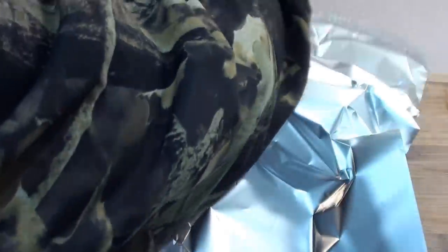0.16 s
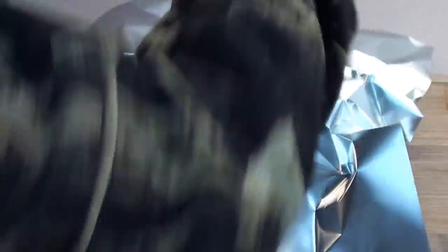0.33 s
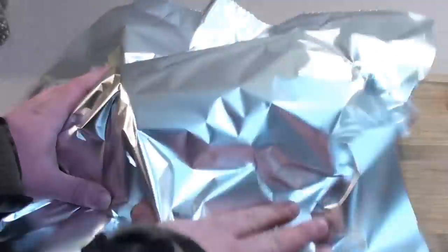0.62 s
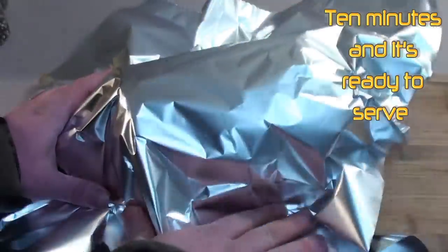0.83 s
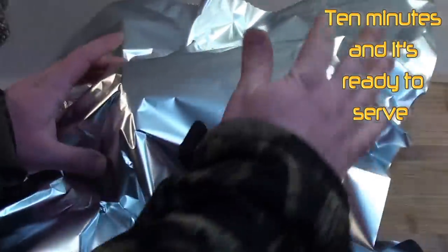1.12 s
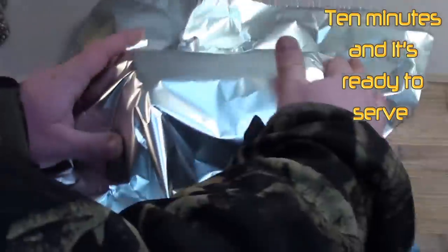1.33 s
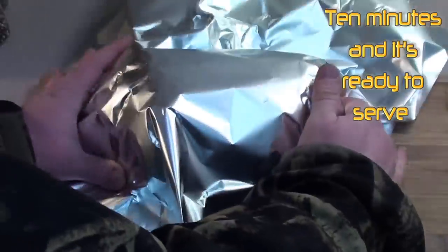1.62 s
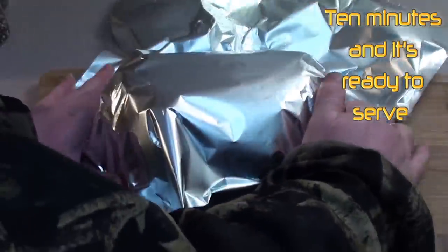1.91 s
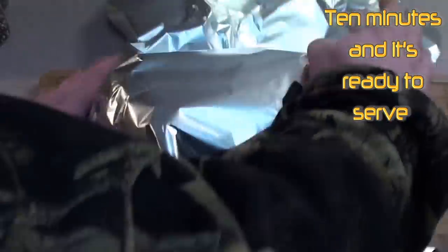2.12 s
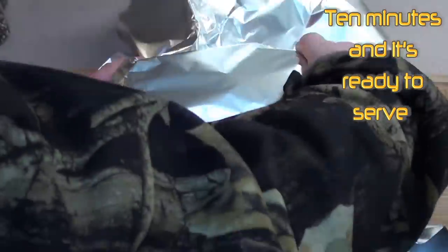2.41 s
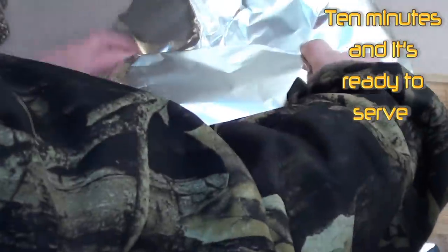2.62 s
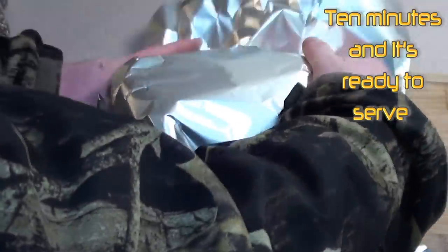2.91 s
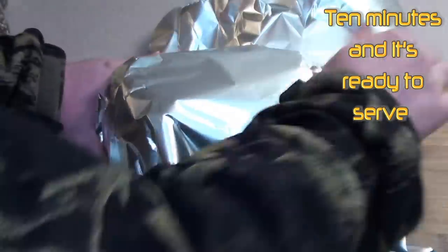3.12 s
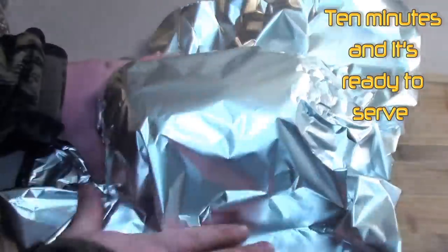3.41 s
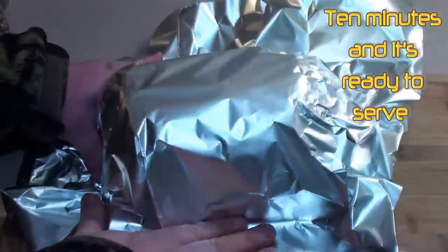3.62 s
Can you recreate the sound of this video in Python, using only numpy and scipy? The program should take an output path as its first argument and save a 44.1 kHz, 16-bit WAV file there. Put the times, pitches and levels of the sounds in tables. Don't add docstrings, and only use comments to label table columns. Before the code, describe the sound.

Close, bright foil crinkling with sharp snaps and duller pops as hands wrap a dish; it dips early, crackles almost continuously, fades late to faint ticks, then returns loudly until the end, over quiet room noise.

```python
import sys
import numpy as np
from scipy import signal
from scipy.fft import rfft, irfft
from scipy.io import wavfile
from scipy.ndimage import uniform_filter1d

SR = 44100
rng = np.random.default_rng(int(sys.argv[2]) if len(sys.argv) > 2 else 0)


def transcribe(signal):
    frames = np.atleast_2d(signal).T
    limited = np.clip(frames, -1, 1)
    pcm = np.round(limited * 32767).astype(np.int16)
    wavfile.write(sys.argv[1], SR, pcm)


def invert_db(level):
    return 10 ** (np.asarray(level, dtype=float) / 20)


N = 165375

# t/s, level/dB
SQUEEZES = [
    [(0.0, -18), (0.06, -21), (0.068, -17), (0.12, -18.5), (0.2, -16), (0.235, -20.5), (0.288, -21)],
    [(0.293, -16.5), (0.33, -18.5), (0.34, -25), (0.4, -31), (0.48, -43), (0.58, -49), (0.588, -25.5),
     (0.604, -36), (0.628, -64)],
    [(2.14, -27), (2.148, -20), (2.17, -17), (2.356, -16.5), (2.44, -18.5), (2.492, -20), (2.515, -36)],
    [(2.52, -18.5), (2.554, -21.5), (2.584, -28.5), (2.59, -19), (2.6, -28.5), (2.64, -25.5), (2.68, -35)],
    [(2.685, -32), (2.713, -18), (2.771, -28), (2.779, -17.5), (2.795, -21), (2.885, -16.5), (3.047, -18.5),
     (3.083, -25), (3.098, -24)],
]
# t/s, level/dB
KNEADING = [
    [(0.632, -24), (0.638, -16.5), (0.856, -19)],
    [(0.858, -18.5), (1.006, -23), (1.014, -17), (1.052, -22)],
    [(1.055, -20), (1.061, -18), (1.131, -27), (1.143, -18.5), (1.161, -18), (1.177, -27.5), (1.189, -19),
     (1.222, -44)],
    [(1.226, -37), (1.232, -25.5), (1.274, -15.5), (1.344, -18), (1.372, -19.5), (1.442, -14.5),
     (1.534, -17.5), (1.548, -21)],
    [(1.552, -21), (1.618, -17.5), (1.85, -17.5)],
    [(1.854, -12), (1.858, -15.5), (1.948, -21.5), (2.06, -17), (2.135, -29.5)],
    [(3.394, -24), (3.398, -15.5), (3.414, -14), (3.564, -19), (3.588, -14), (3.6, -19.5)],
    [(3.604, -22.5), (3.654, -18.5), (3.66, -27), (3.67, -15.5), (3.682, -23), (3.75, -18)],
]
# t/s, level/dB
LETTING_GO = [
    [(3.102, -20.5), (3.14, -24), (3.186, -25.5), (3.198, -34), (3.2, -30)],
    [(3.203, -15.5), (3.214, -24), (3.218, -27), (3.251, -37), (3.259, -35), (3.29, -49), (3.322, -59)],
    [(3.325, -29), (3.335, -48), (3.352, -45), (3.357, -50), (3.376, -36), (3.391, -26)],
]
# t/s, peak level/dB, brightest f/Hz
BIG_CREASES = [(0.0168, -12, 8510), (0.0648, -8, 8110), (0.2917, -13, 4730), (0.438, -22, 3160),
               (0.574, -26, 4790), (0.5863, -17, 6100), (0.634, -4, 6550), (0.7473, -6, 6700),
               (0.8583, -0.5, 6860), (0.8803, 0, 6100), (0.9328, -5.5, 8070), (0.9535, -4, 3470),
               (0.973, -6, 9200), (1.0122, -8, 5970), (1.058, -4, 5760), (1.1414, -15, 7810),
               (1.1565, -16, 6200), (1.1862, -9, 5840), (1.2316, -14, 6020), (1.2687, 0, 5110),
               (1.5527, -6, 8930), (1.82, -5, 8680), (1.9632, -3.5, 6230), (2.147, -4.5, 6610),
               (2.206, -16, 8130), (2.4422, -2, 8610), (2.5187, -8, 5700), (2.588, -6, 7930),
               (2.616, -19, 6010), (2.6928, -10, 5260), (2.7117, -15, 8000), (2.7768, -6, 5240),
               (3.1047, -2.5, 6060), (3.142, -8.5, 4950), (3.2013, -17, 4800), (3.2538, -15, 8410),
               (3.325, -34, 5870), (3.3558, -31, 6260), (3.3775, -25, 6750), (3.3981, -9, 6070),
               (3.4102, -11, 6820), (3.621, -1.5, 7670), (3.647, -3.5, 6210), (3.6671, -7, 8130),
               (3.6972, -9, 6150), (3.716, -3, 6400)]
# t/s, tilt/dB per octave
FINENESS = [(0, -1.5), (.2, 2), (.36, -1.5), (.55, 2), (.7, 6.5), (.9, 0), (1.1, 0.5), (1.3, -.5),
            (1.5, -1), (1.75, 0.5), (2.0, -2), (2.35, 1), (2.6, -4.5), (2.85, 0), (3.1, -1.5), (3.25, -3),
            (3.38, -1.5), (3.45, 2.5)]
# f/Hz, level/dB
SHEET_COLOUR = [(88, -54), (150, -18.5), (217, -25), (244, -33.5), (1180, -7.5), (2370, -6.5), (5680, -2),
                (8880, 1), (15600, -13)]
# f/Hz, time to fall 60 dB/s
SHEET_RING = [(200, 0.26), (1500, 0.04), (6000, 0.077), (15000, 0.026)]
# f/Hz, rise/dB, width/octaves
RESONANCES = [(2350, -2.5, 0.11), (3310, 2, 0.12), (4040, -3.5, 0.058), (5930, 2.5, 0.098),
              (8940, -0.5, 0.036)]
# t/s, level/dB
BENDING = [(0.0, -37.5), (0.42, -45.5), (0.62, -50), (0.67, -36), (0.78, -47), (0.97, -47), (1.13, -53),
           (1.37, -36.5), (2.91, -43), (2.96, -35.5), (3.25, -44), (3.37, -52.5), (3.402, -27.5),
           (3.55, -59), (3.559, -29), (3.7, -53), (3.75, -51)]
# t/s, peak level/dB, f/Hz
FLIPS = [(0.06, -23, 1104), (0.136, -11, 1430), (0.586, -32, 1790), (0.637, -16, 2330), (0.668, -15, 1080),
         (0.731, -22, 1620), (0.806, -19, 1630), (0.882, -19, 1930), (0.953, -14, 1680),
         (1.016, -25.5, 2080), (1.133, -31, 1200), (1.23, -29, 910), (1.338, -29.5, 865),
         (1.364, -20, 1460), (1.415, -12.5, 1960), (1.553, -20, 1680), (1.66, -19.5, 1780),
         (1.706, -25, 984), (1.796, -30, 1960), (1.851, -12, 2080), (1.883, -14, 1920),
         (2.179, -16.5, 1280), (2.492, -34, 2160), (2.665, -27, 1700), (2.824, -20, 1780),
         (2.906, -29, 1810), (3.106, -12.5, 2330), (3.397, -17, 1490), (3.466, -22, 1110),
         (3.518, -14, 2190), (3.567, -17, 1330), (3.615, -18, 1320), (3.645, -18, 1530),
         (3.665, -18.5, 1510)]
# t/s, peak level/dB, f/Hz
KNOCKS = [
    (0.13, -39, 292),
    (0.456, -46, 168),
    (0.681, -40, 133),
    (2.147, -37.5, 208),
    (2.293, -32, 179),
    (2.498, -35, 290),
    (2.658, -40.5, 248),
    (3.397, -39, 235),
    (3.565, -47, 159),
    (3.62, -43, 258),
]
# f/Hz, side against middle/dB
STEREO_WIDTH = [(150, -30), (500, -15), (1200, -19.5), (2500, -18), (5500, -15), (9000, -16.5),
                (11500, -28.5), (15000, -25)]
# f/Hz, time to fall 60 dB/s
KITCHEN_TAIL = [(200, 0.13), (1500, 0.52), (6000, 0.43), (15000, 0.022)]
# f/Hz, level/dB
AIR_COLOUR = [(29, -41), (50, -10), (236, -3), (690, -8), (1060, -5), (2280, -7), (7690, -7), (15000, -35)]

KNEE_DB, SQUASH = -25, 0.34


def rms_one(x):
    return x / np.sqrt(np.mean(x ** 2) + 1e-20)


def at_hz(points, hz):
    table_hz, values = np.array(points).T[:2]
    return np.interp(np.log(hz + 1), np.log(table_hz), values)


def over_time(points):
    return np.interp(np.arange(N) / SR, *np.transpose(points))


def bump(hz, centre_hz, octaves):
    return np.exp(-(np.log2((hz + 1) / centre_hz) / octaves) ** 2)


def drift(hz):
    r = np.exp(-2 * np.pi * hz / SR)
    noise = rng.standard_normal(N + SR)
    return rms_one(signal.lfilter([1], [1, -2 * r, r * r], noise)[SR:])


def highpass(x, hz, order=2):
    return signal.sosfilt(signal.butter(order, hz, "high", fs=SR, output="sos"), x)


def coloured(db_at, size):
    hz = np.arange(size // 2 + 1) * SR / size
    mid, side = rfft(rng.standard_normal((2, size))) * invert_db(db_at(hz))
    side = side * invert_db(at_hz(STEREO_WIDTH, hz))
    return hz, np.array([mid + side, mid - side])


def dying_noise(db_at, t60s, size):
    hz, spectrum = coloured(db_at, size)
    t = np.arange(size) / SR
    out = 0
    for centre in 125 * 2. ** np.arange(8):
        octaves_away = np.abs(np.log2(np.clip(hz, 125, 16000) / centre))
        share = np.clip(1 - octaves_away, 0, 1)
        t60_s = max(at_hz(t60s, centre), .003)
        out = out + irfft(spectrum * share, size) * invert_db(-60 * t / t60_s)
    return out / np.sqrt(np.sum(out[0] ** 2))


def pressure():
    s, db = np.concatenate(SQUEEZES + KNEADING + LETTING_GO).T
    order = np.argsort(s)
    db = over_time(np.transpose([s[order], db[order]]))
    return db + np.maximum(db - KNEE_DB, 0) * SQUASH / (1 - SQUASH)


def clicks(rate):
    size_db = 4.0 * np.minimum(rng.exponential(1, N), 3.2)
    sizes = invert_db(size_db) * rng.choice([-1, 1], N)
    happens = rng.random(N) < rate / SR
    return rms_one(sizes) * happens * np.sqrt(SR / rate)


def crackle(db):
    below_peak = db - db.max()
    rate = 3000 * invert_db(.35 * below_peak)
    clump_db = 1.5 * (0.33 + .03 * np.minimum(-below_peak, 15)) * drift(30)
    train = clicks(rate) * invert_db(db + 0.5 + clump_db)
    dealt = rng.integers(0, 24, N)
    tilt = 0.24 * (db - db.mean()) + over_time(FINENESS)
    patches = [3 * drift(9) for _ in range(8)]  # dB, groups of facets come and go
    luck = rng.random((len(BIG_CREASES), 4))
    crack = 1 + invert_db(1 - 60 * np.arange(4096) / SR / 0.0042)
    out = np.zeros((2, N))
    for k, peak_hz in enumerate(np.geomspace(12000, 1500, 24)):
        strikes = train * (dealt == k) * invert_db(tilt * np.log2(peak_hz / 5000) + patches[k // 3])
        for (s, peak_db, snap_hz), chance in zip(BIG_CREASES, luck):
            at = ((s + 0.0024 * chance * np.arange(4)) * SR).astype(int)
            snap_db = peak_db - 21.5 + 0.26 * (peak_db - KNEE_DB) - 4.1 * np.arange(4)
            strikes[at] += 10 * invert_db(snap_db) * bump(snap_hz, peak_hz, 0.67)

        def facet_colour(hz):
            resonances = sum(rise * bump(hz, f, width) for f, rise, width in RESONANCES)
            return at_hz(SHEET_COLOUR, hz) + 4.5 * bump(hz, peak_hz, 0.59) + resonances

        facet = crack * dying_noise(facet_colour, SHEET_RING, size=4096)
        facet = facet / np.sqrt(np.sum(facet[0] ** 2))
        out += signal.oaconvolve(strikes[None], facet, axes=1)[:, :N]
    top = out - signal.sosfiltfilt(signal.butter(2, 9400, fs=SR, output="sos"), out)
    top_db = 0.42 * np.clip(db + 13.5, -25, 0)
    return out - top * (1 - invert_db(top_db))


def ticks():
    out, t = np.zeros((2, N + 2048)), np.arange(2048) / SR
    rise = 1 - np.exp(-t / 0.00078)
    for s, peak_db, snap_hz in BIG_CREASES:
        _, spectrum = coloured(lambda hz: at_hz(SHEET_COLOUR, hz) + 12 * bump(hz, snap_hz, 0.5), size=2048)
        fade = invert_db(peak_db - 5 - 60 * t / 0.032)
        out[:, int(s * SR):][:, :2048] += fade * rise * rms_one(irfft(spectrum))
    return out[:, :N]


def pops():
    train = clicks(np.full(N, 700)) * invert_db(8.5 + over_time(BENDING) + 2.0 * drift(9.4))
    dealt = rng.integers(0, 24, N)
    out = 0
    for k, hz in enumerate(np.geomspace(342, 2020, 24)):
        r = invert_db(-60 * hz / (13.3 * SR))
        w = 2 * np.pi * hz / SR
        level = np.sqrt(1 - r * r) * invert_db(.5 * at_hz(SHEET_COLOUR, hz))
        strikes = train * (dealt == k) + 1e-18
        out = out + level * signal.lfilter([np.sin(w)], [1, -2 * r * np.cos(w), r * r], strikes)
    return out * invert_db(7)


def struck(table, db, cycles):
    out, t = np.zeros(N + 8192), np.arange(8192) / SR
    for (s, peak_db, hz), luck in zip(table, rng.random((len(table), 2))):
        main = np.sin(2 * np.pi * hz * t)
        upper = 0.62 * np.sin(2 * np.pi * (hz * (1.21 + 0.4 * luck[0]) * t + luck[1]))
        lower = .5 * np.sin(2 * np.pi * max(hz * 0.47, 130) * t)
        fade = invert_db(peak_db + db - 60 * t * hz / cycles)
        rise = 1 - np.exp(-t * hz / 1.03)
        out[int(s * SR):][:8192] += fade * rise * (main + upper + lower)
    return out[:N]


def kitchen(x):
    late = np.pad(x.mean(axis=0), (int(.006 * SR), 0))[:N]
    place = np.arange(N) // 3000 % 3
    out = 0
    for k in range(3):
        tail = dying_noise(lambda hz: 0 * hz, KITCHEN_TAIL, size=20480)
        out = out + signal.oaconvolve((late * (place == k))[None], tail, axes=1)[:, :N]
    return invert_db(-11.5) * out


def room_tone():
    _, spectrum = coloured(lambda hz: at_hz(AIR_COLOUR, hz), size=N + 1)
    air = rms_one(irfft(spectrum)[:, :N])
    hum = invert_db(-58.5 + 2 * drift(2.8)) * np.sin(2 * np.pi * 120 * np.arange(N) / SR)
    return invert_db(-43) * air + hum


def gain_control(x):
    release_db_per_s, attack_s = 106, 0.00035
    db = 10 * np.log10(uniform_filter1d(x.mean(axis=0) ** 2, size=220) + 1e-9)
    ramp = release_db_per_s * np.arange(N) / SR
    held_db = np.maximum.accumulate(db + ramp) - ramp
    over = np.maximum(held_db - KNEE_DB, 0)
    r = np.exp(-1 / (attack_s * SR))
    smooth = signal.lfilter([1 - r], [1, -r], over, zi=[r * over[0]])[0]
    return x * invert_db(-SQUASH * smooth)


def scene():
    sheet = highpass(crackle(pressure()) + ticks() + pops(), 215)
    foil = sheet + struck(FLIPS, db=4, cycles=37) + struck(KNOCKS, db=9.5, cycles=14.7)
    left_right = invert_db(np.array([[-0.8], [0]]))
    return foil * left_right + kitchen(foil) + room_tone()


def top_cut(x):
    return signal.sosfilt(signal.butter(12, 16470, fs=SR, output="sos"), x)


def record(dry):
    top = 0.62
    mid = dry.mean(axis=0)
    side = highpass(dry[0] - dry[1], 314, order=4) / 2
    x = gain_control(mid + side * [[1], [-1]])
    x = np.tanh(x / top) * top
    x = highpass(x, 61.6)
    x = signal.sosfilt(signal.ellip(10, .5, 70, 15620, fs=SR, output="sos"), x)
    return top_cut(x)


dry = scene()
out = record(dry)
transcribe(out)
```